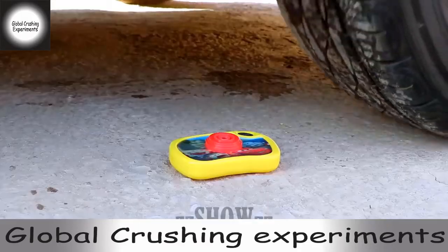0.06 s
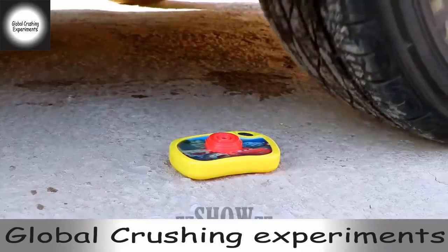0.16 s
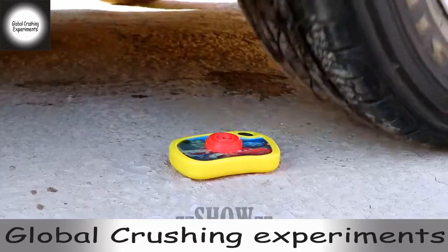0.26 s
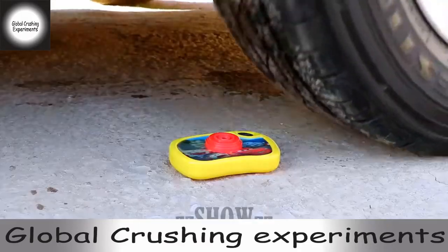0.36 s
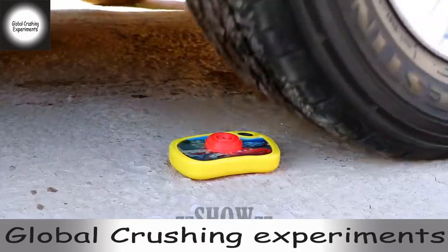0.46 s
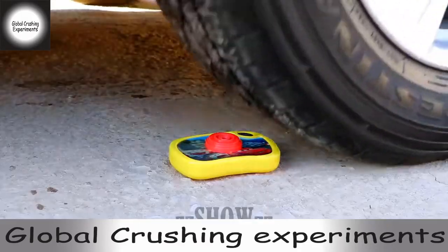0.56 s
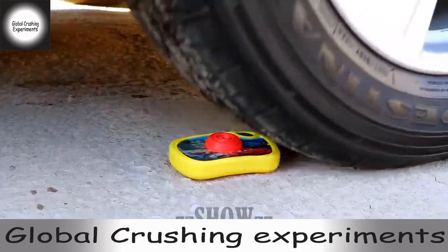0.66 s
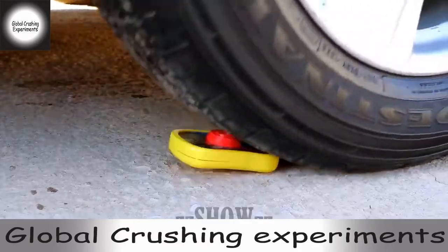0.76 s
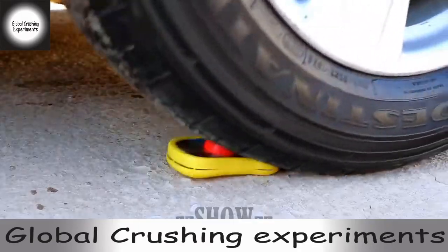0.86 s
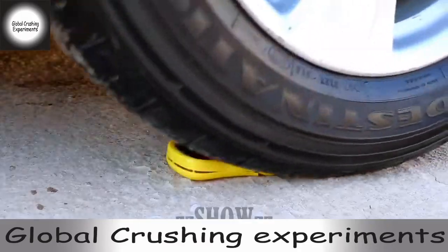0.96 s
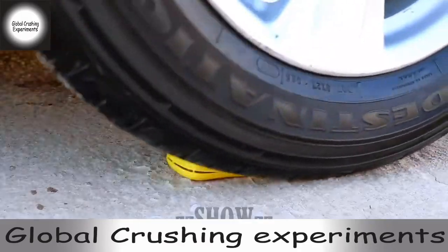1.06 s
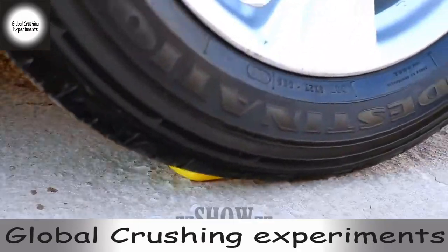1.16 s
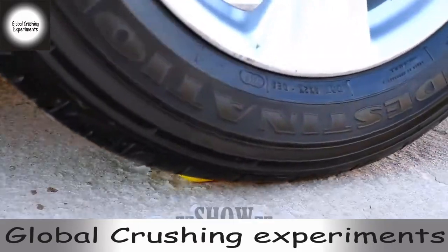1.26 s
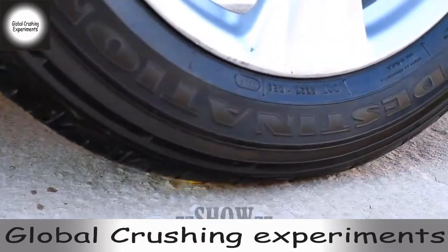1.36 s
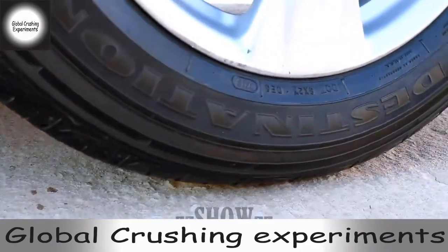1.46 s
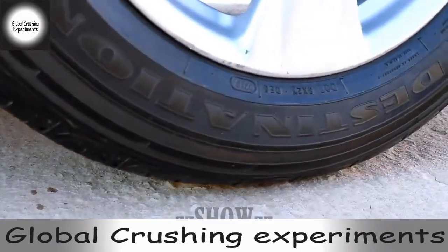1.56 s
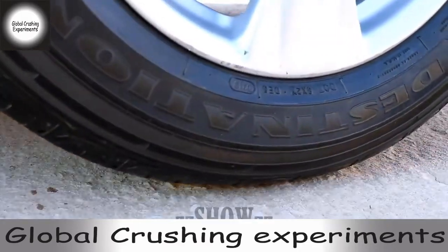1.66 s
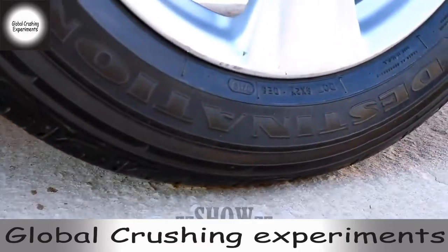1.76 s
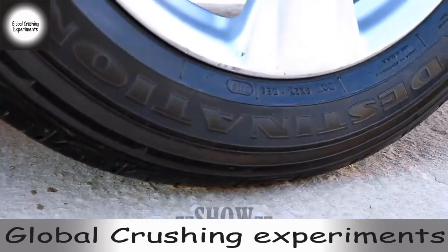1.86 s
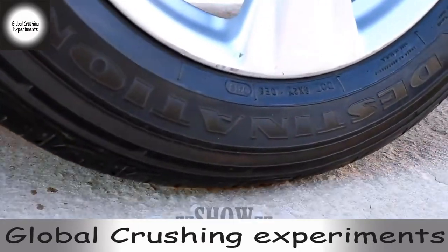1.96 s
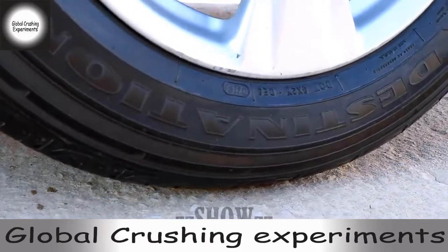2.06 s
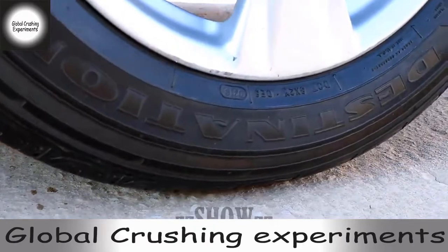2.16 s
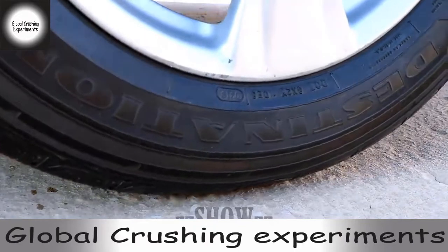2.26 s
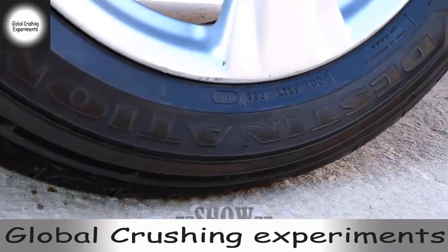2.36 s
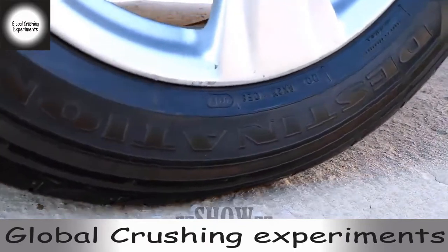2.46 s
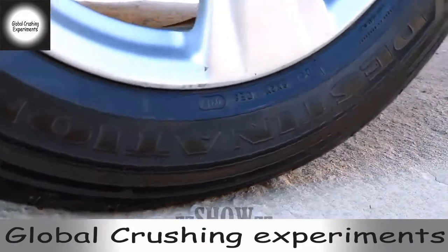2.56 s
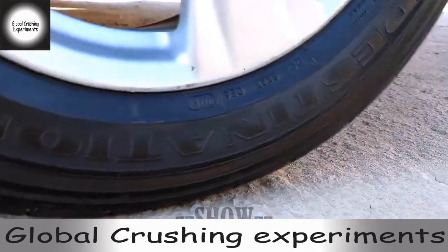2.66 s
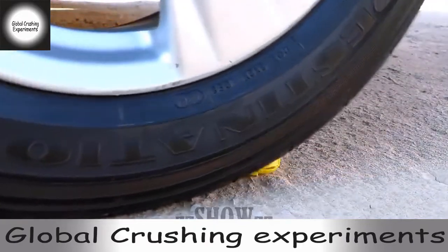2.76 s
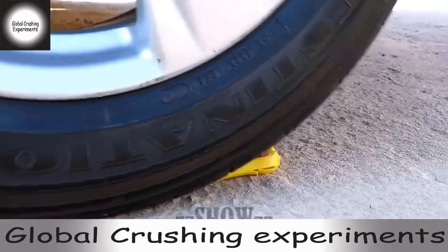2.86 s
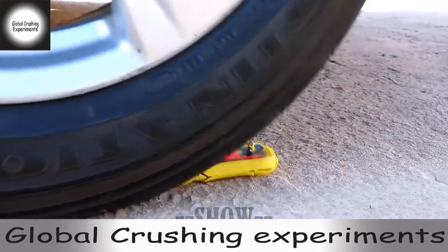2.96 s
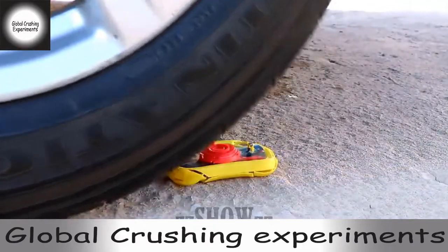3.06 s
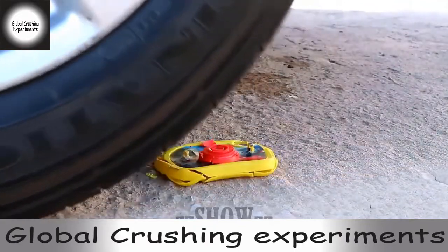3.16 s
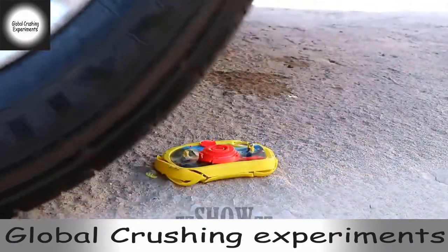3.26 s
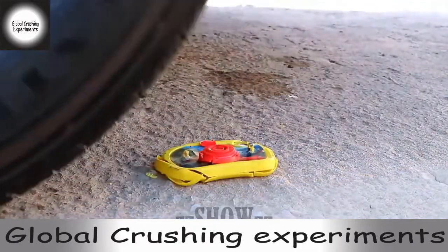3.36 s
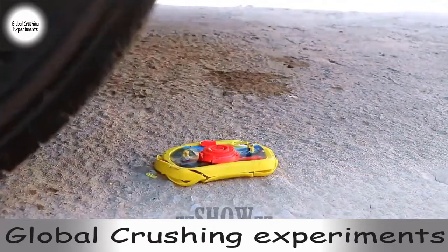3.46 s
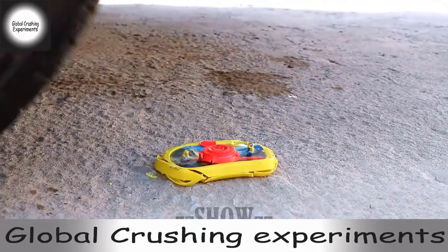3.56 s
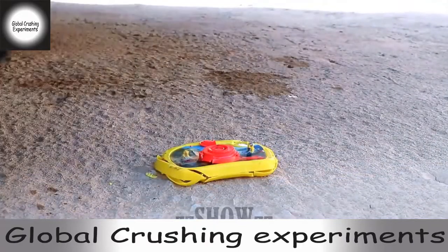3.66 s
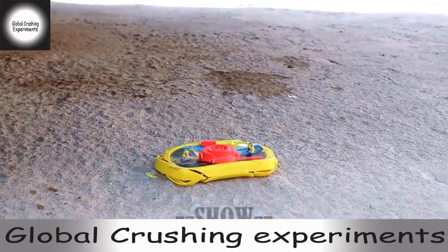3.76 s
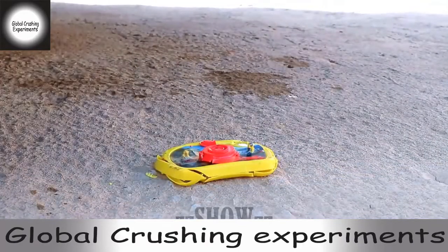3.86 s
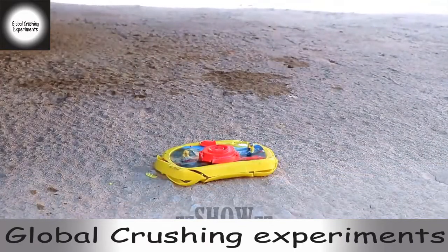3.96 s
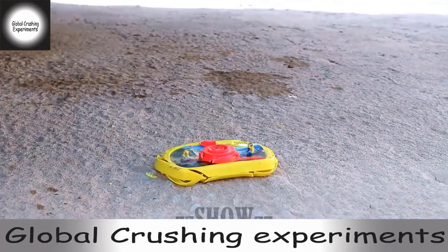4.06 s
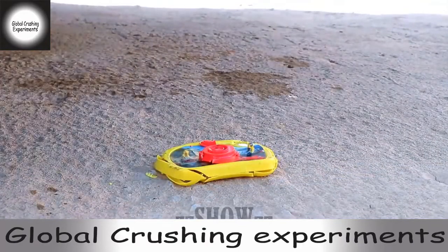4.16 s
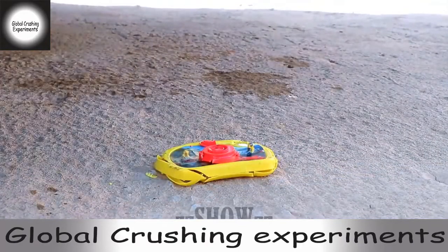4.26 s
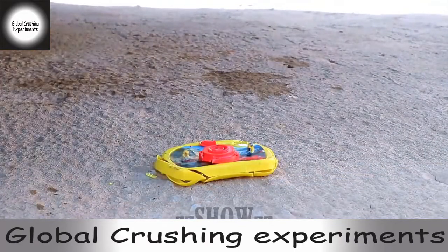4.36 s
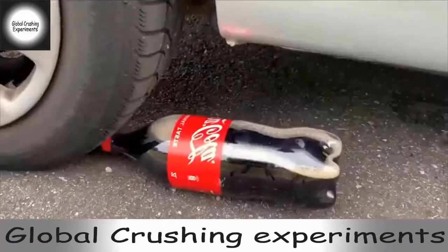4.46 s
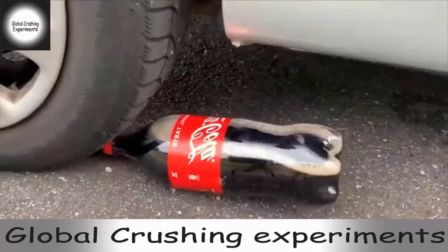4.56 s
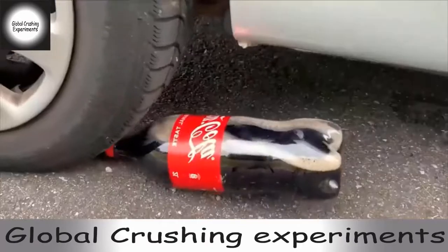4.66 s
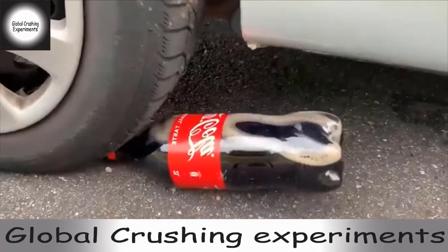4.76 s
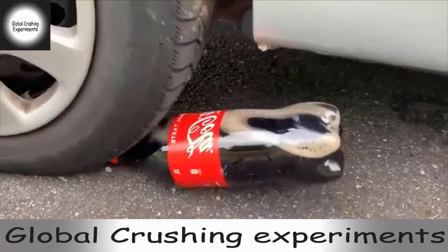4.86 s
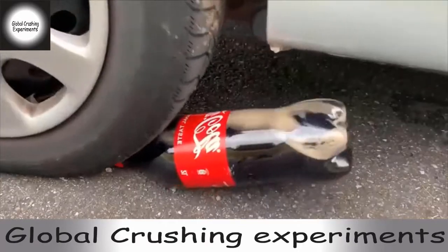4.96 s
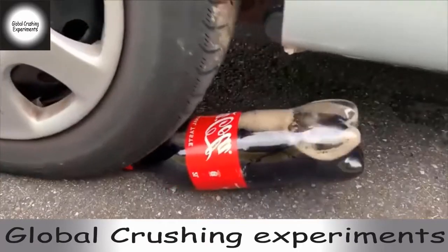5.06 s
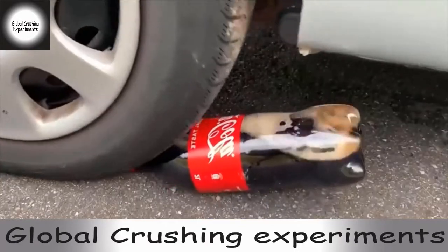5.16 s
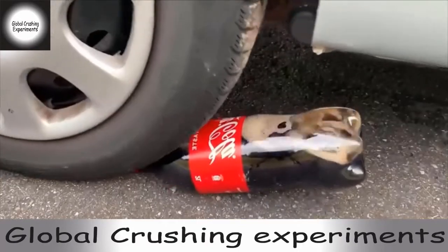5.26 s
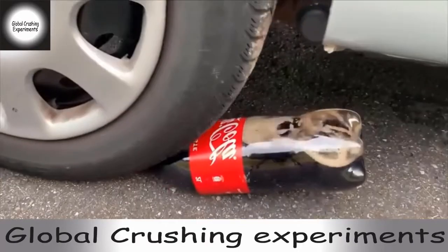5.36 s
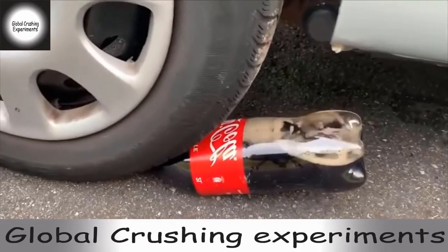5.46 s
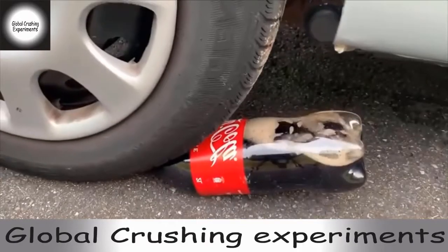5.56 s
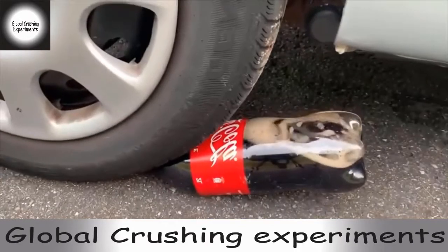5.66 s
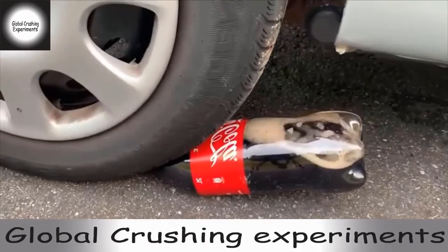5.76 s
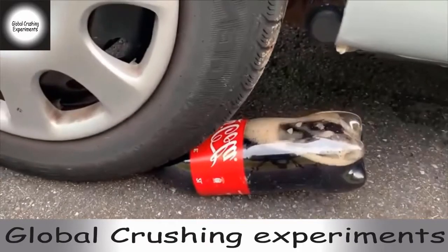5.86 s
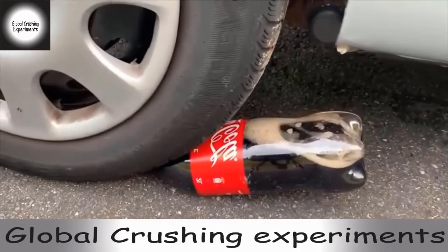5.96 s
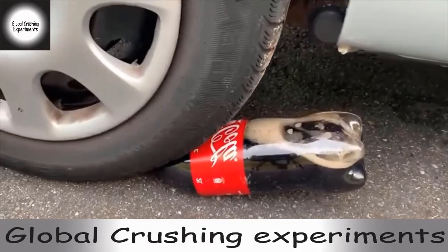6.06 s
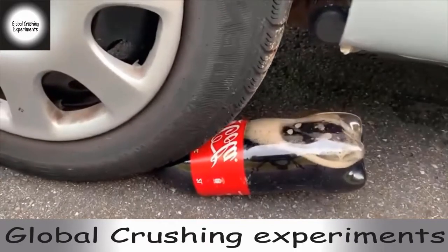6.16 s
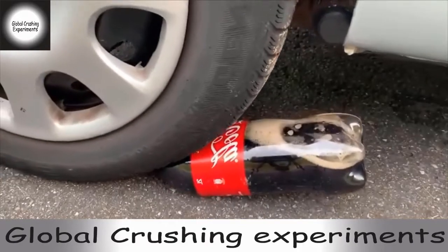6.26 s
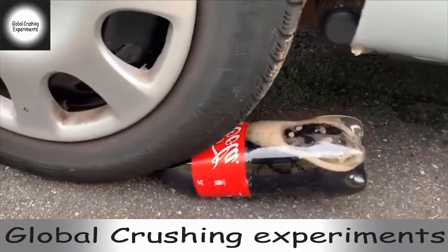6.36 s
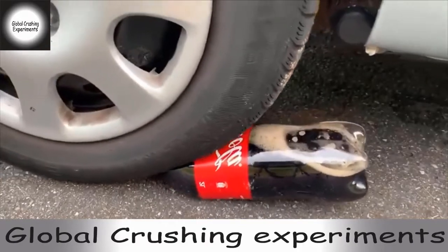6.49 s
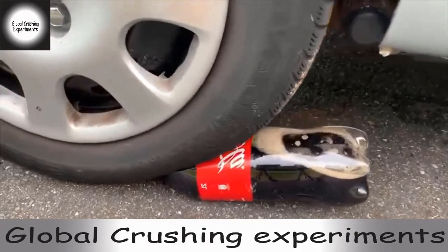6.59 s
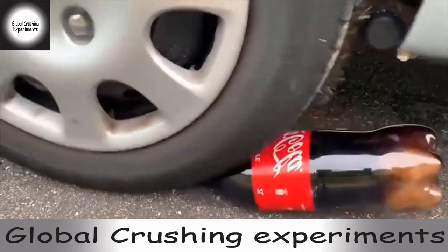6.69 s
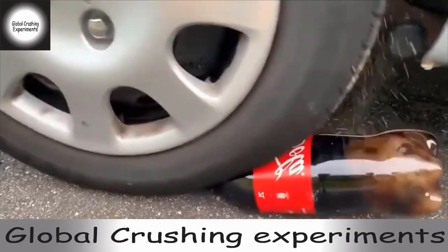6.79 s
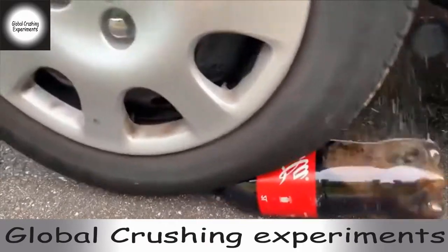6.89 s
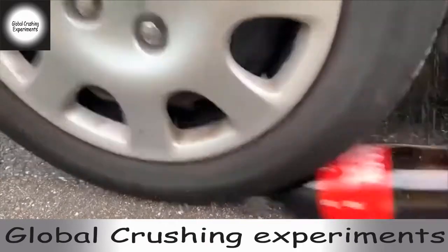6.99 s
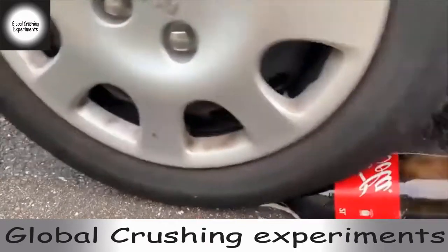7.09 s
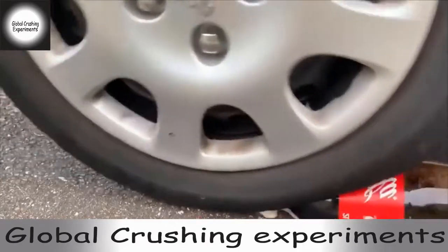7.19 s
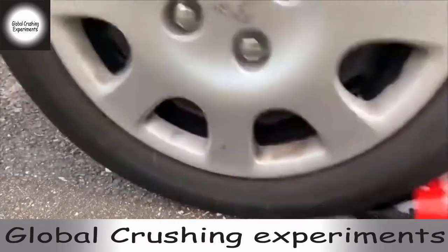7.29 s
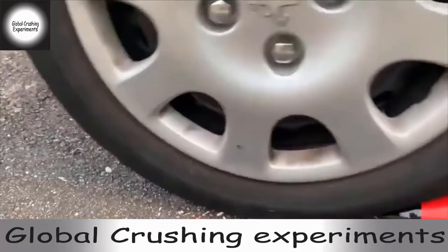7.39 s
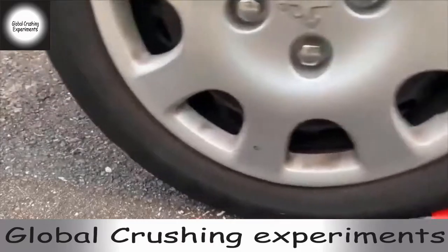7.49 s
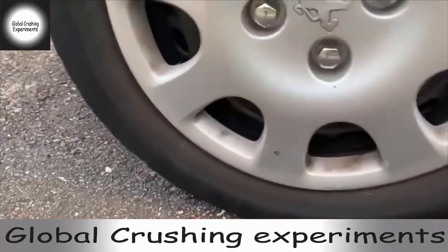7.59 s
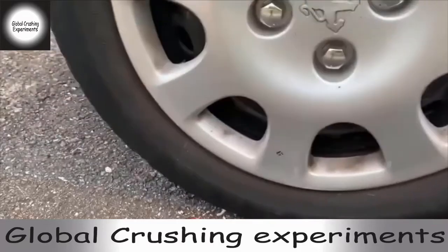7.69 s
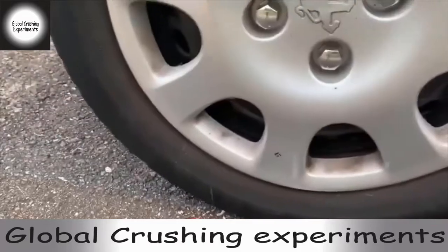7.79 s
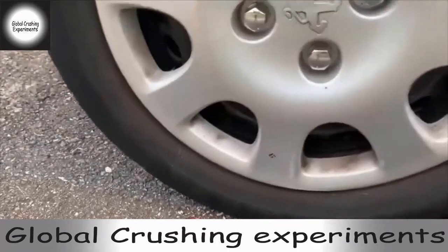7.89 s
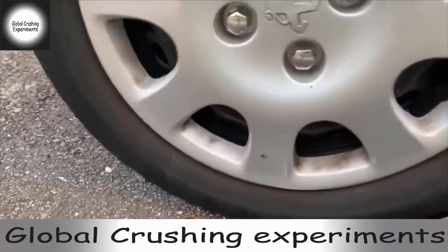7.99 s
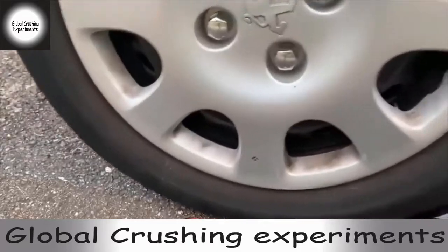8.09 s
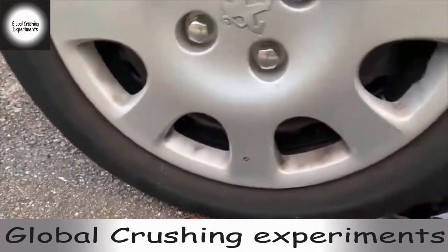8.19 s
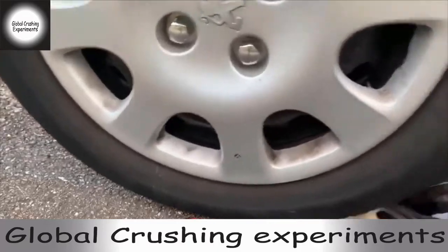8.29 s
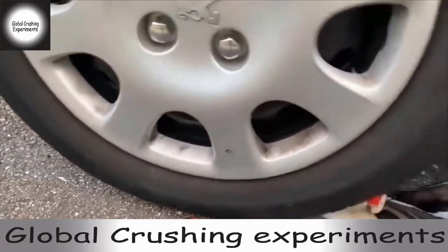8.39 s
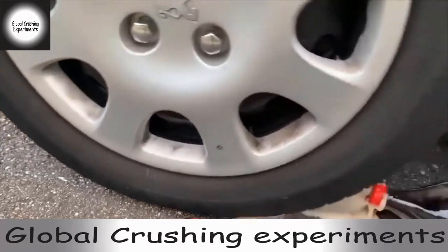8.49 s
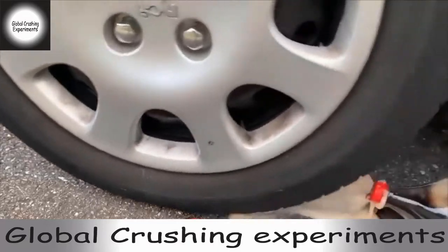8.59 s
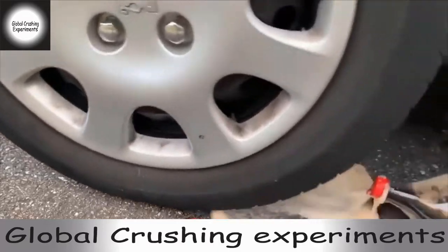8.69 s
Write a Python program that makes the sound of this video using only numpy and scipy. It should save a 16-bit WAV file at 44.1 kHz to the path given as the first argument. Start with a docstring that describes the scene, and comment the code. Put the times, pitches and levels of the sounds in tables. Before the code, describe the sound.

Outdoors, very close to the microphone, a tyre creeps over a hollow plastic toy: a dense, distorted burst of cracks and creaks, then scattered hollow snaps dying into faint ticks. A car idles quietly far off. After a hard cut, a nearer engine revs up and eases down while a full plastic bottle jerks over asphalt with scrapes, sharp pops and liquid thuds, ending in bright sputtering spray.

```python
"""A hollow plastic toy cracks under a creeping tyre, close to the microphone and loud enough to overload it:
struck resonances of shard, hollow and tyre, with creaks and air puffs. Far off in the yard a car idles.
After a cut, a second engine revs as firing orders plus exhaust noise while its tyre jerks a full
plastic bottle over asphalt: filtered noise skids, ringing ticks and at last a sputtering spray.
The first shot is mono, the second has two microphone ports."""
import sys
import numpy as np
from scipy import signal
from scipy.io import wavfile
from scipy.ndimage import uniform_filter1d

SR = 44100
rng = np.random.default_rng(int(sys.argv[2]) if len(sys.argv) > 2 else 0)


def wrap_up_sound(samples):
    """Save the sound to the file named by the first command line argument, as 16-bit audio."""
    columns = np.atleast_2d(samples).T
    # keep every value between -1 and 1, then stretch to whole-number steps
    tamed = np.clip(columns, -1, 1)
    steps = np.round(tamed * 32767).astype(np.int16)
    wavfile.write(sys.argv[1], SR, steps)


N = 384993
T = np.arange(N) / SR
CUT_S = 4.483
LEAD_S = 0.00033  # the left port hears the engine first

# spectrum of breaking plastic, for cracks and creaks: f/Hz, relative level/dB per Hz
SNAP_SPECTRUM = [(760, -28.5), (1300, -7.5), (1840, -1.5), (3140, -1), (4930, -3), (7430, -13),
                 (13200, -23), (16000, -27)]


def amp(db):
    """Decibels to gain."""
    return 10 ** (np.asarray(db) / 20)


def evened(x):
    """Scales to rms 1."""
    return x / np.sqrt(np.mean(x ** 2) + 1e-20)


def read(points, hz):
    """Reads a table on a log-frequency axis."""
    f, value = np.transpose(points)
    return np.interp(np.log(hz + 1), np.log(f + 1), value)


def level(rows, column=1):
    """Gain along a dB column, silent outside the table."""
    rows = np.array(rows)
    return amp(np.interp(T, rows[:, 0], rows[:, column], -200, -200))


def add(mix, s, sound):
    """Mixes a sound in at s seconds."""
    part = mix[..., round(s * SR):][..., :sound.shape[-1]]
    part += sound[..., :part.shape[-1]]


def colour(x, points):
    """Causal minimum-phase filter of unit energy with the given spectrum."""
    hz = abs(np.fft.fftfreq(4096, 1 / SR))
    log_gain = np.log(amp(np.maximum(read(points, hz), -100)))
    taps = np.fft.ifft(np.exp(np.conj(signal.hilbert(log_gain)))).real[:2048]
    return signal.oaconvolve(x, taps / np.linalg.norm(taps))[:len(x)]


def ring(x, hz, width_hz):
    """A band-pass mode struck by x; a unit click rings with height 1."""
    r, w = np.exp(-np.pi * width_hz / SR), 2 * np.pi * hz / SR
    return signal.lfilter([.5, 0, -.5], [1, -2 * r * np.cos(w), r * r], x)


def noise(points, patchy_db, lead_s=0., size=512, span=(CUT_S, N / SR)):
    """Patchy noise of rms 1 at two ports inside a time span; the ports share less of the treble."""
    # how alike the two ports are: f/Hz, left-right likeness (0 to 1)
    likeness = [(60, 0.96), (500, 1), (2000, 0.31), (6000, 0.093), (15000, 0.1)]
    start, stop = round(span[0] * SR), round(span[1] * SR)
    hz, out = np.fft.rfftfreq(size, 1 / SR), np.zeros((2, N))
    frames = (stop - start) * 4 // size + 5
    a, b, c, d, patches = rng.standard_normal((frames, len(hz), 5)).T
    patches = uniform_filter1d(patches, size=size // 80, axis=0)
    patches = evened(uniform_filter1d(patches, size=8192 // size, axis=1))
    same = np.clip(read(likeness, hz), 0, 1)[:, None]
    left = a + 1j * b
    delay = np.exp(-2j * np.pi * hz * lead_s)[:, None]
    right = same * left * delay + np.sqrt(1 - same ** 2) * (c + 1j * d)
    z = np.array([left, right]) * amp(read(points, hz)[:, None] + patchy_db * patches)
    sound = signal.istft(z, nperseg=size, noverlap=size * 3 // 4)[1]
    out[:, start:stop] = evened(sound[:, :stop - start])
    return out


def yard():
    """Outdoor hush as shaped noise, a steady idle drone and far exhaust puffs, every other one weaker."""
    # outdoor hush: f/Hz, relative level/dB per Hz
    hush_spectrum = [(20, -8.5), (60, -18.5), (130, -13.5), (250, -10), (380, -15), (480, -12.5),
                     (660, -12.5), (1480, -21.5), (2460, -27.5), (6500, -40), (11000, -58.5), (15500, -77)]
    # the car rolls away, hush gain before the base level: t/s, level/dB
    swell = [(0, 9.5), (.7, 9.5), (3.3, 6.5), (4.48, 6)]
    pair_hz, puffs_db = 19.6, -68  # one strong and one weak puff per pair
    hush_db, drone_hz, drone_db = -61.5, 97, -63
    turns = pair_hz * T
    beats = np.exp(-(turns % 1) / 0.091) + .5 * np.exp(-((turns + .5) % 1) / 0.065)
    beats = ring(beats, 56, 92) + 0.69 * ring(beats, 340, 150)
    hush = amp(hush_db) * noise(hush_spectrum, 1.6, size=2048, span=(0, CUT_S))[0] * level(swell)
    drone = amp(drone_db) * np.sqrt(2) * np.sin(2 * np.pi * drone_hz * T)
    return hush + drone + amp(puffs_db) * evened(beats)


def engine():
    """Firing orders as sines through the pipe, uneven cylinders as half orders, roar gated by each firing."""
    # second engine: t/s, firing f/Hz, then level/dB of firing thump, exhaust note (before the pipe),
    # exhaust roar, valve and tyre hiss
    revs = [(4.48, 22.22, -44, -20, -32, -42.5), (4.611, 22.93, -41.5, -29, -33.5, -45),
            (4.792, 26.4, -37, -28.5, -37.5, -42.5), (4.95, 31.99, -22, -26, -33, -41.5),
            (5.149, 39.07, -35, -24.5, -31.5, -36), (5.31, 40.93, -33, -23, -31.5, -38),
            (5.668, 44.06, -26, -25, -31, -38.5), (5.95, 46.62, -48, -17.5, -28.5, -38),
            (6.33, 51.5, -34, -22, -26.5, -38.5), (6.57, 47.1, -37, -19, -28.5, -33.5),
            (6.97, 40.4, -24, -21, -32.5, -35.5), (7.179, 33.98, -26, -29.5, -31, -34.5),
            (7.41, 26.85, -20.5, -32.5, -43, -30.5), (7.549, 28.34, -22.5, -29.5, -51, -35),
            (7.719, 31.3, -20, -28.5, -64, -32.5), (7.88, 33.3, -22, -28.5, -42, -33),
            (8.16, 30.4, -22.5, -28.5, -45, -37.5), (8.41, 28.85, -19.5, -34.5, -38.5, -36.5),
            (8.73, 28.9, -20, -44, -44.5, -38)]
    # how the exhaust pipe passes orders two to six: f/Hz, level/dB
    pipe = [(44, -1.5), (62, -7), (90, -3.5), (105, -10), (125, -19.5), (148, 0), (165, 3), (190, -15),
            (215, -18.5), (240, -11), (270, -20), (310, -27)]
    # upper orders through the pipe, before they waver: f/Hz, level/dB re roar
    upper = [(200, -3), (330, -22.5), (450, -13.5), (600, -18), (800, -22), (1200, -26)]
    # exhaust roar: f/Hz, relative level/dB per Hz
    roar_spectrum = [(12, -41), (20, -5.5), (87, -11), (127, -5), (163, -3.5), (339, -11.5), (494, -17.5),
                     (573, -8.5), (1010, -19), (3000, -52), (3900, -55), (6600, -120)]
    # valve and tyre hiss: f/Hz, relative level/dB per Hz
    hiss_spectrum = [(700, 5), (1200, 4), (3000, -9), (6000, -14.5), (9500, -13), (11500, -26.5),
                     (13500, -13), (15500, -18)]
    low_orders, waver_db, roar_patchy_db = 6, 3, 1.6
    cut, (s, firing_hz, *levels) = round(CUT_S * SR), np.transpose(revs)
    t = T[cut:]
    turns = np.cumsum(np.interp(t, s, firing_hz)) / SR  # one turn per firing
    coarse = t[::441]  # levels move in 10 ms steps, joined by lines
    hz, thump_db, note_db, roar_db, hiss_db = (
        np.interp(coarse, s, column) for column in (firing_hz, *levels))
    wavers = evened(uniform_filter1d(rng.standard_normal((len(coarse), 16)), size=10, axis=0))
    tone = np.zeros(len(t))
    for k in range(1, low_orders + 1):
        order_db = note_db + read(pipe, k * hz) if k > 1 else thump_db
        gain = np.sqrt(2) * np.interp(t, coarse, amp(order_db))
        half_order = amp(-26) * np.sin(2 * np.pi * (k + .5) * turns)
        tone += gain * (np.sin(2 * np.pi * k * turns + .8 * k) + half_order)
    for k, waver in enumerate(wavers.T, start=low_orders + 1):
        db = roar_db + read(upper, k * hz) + waver_db * waver
        tone += np.interp(t, coarse, amp(db)) * np.sin(2 * np.pi * k * turns + .3 * k * k)
    gate = evened(1 + 0.75 * np.exp(-(turns % 1) / 0.44))
    roar = noise(roar_spectrum, roar_patchy_db, LEAD_S, size=2048)[:, cut:]
    roar = np.interp(t, coarse, amp(roar_db)) * gate * roar
    hiss = np.interp(t, coarse, amp(hiss_db)) * noise(hiss_spectrum, 1.5, LEAD_S)[:, cut:]
    ports = np.array([tone * amp(-.7), np.interp(t - LEAD_S, t, tone)]) + roar + hiss
    return np.pad(ports, ((0, 0), (cut, 0)))


def spray():
    """Drink foam jets from the cap: bright noise that sputters as bubbles pass."""
    # drink spraying from the cap, before the sputter: t/s, level/dB
    bursts = [(8.15, -42), (8.19, -34), (8.256, -28), (8.28, -23), (8.358, -29), (8.482, -24), (8.722, -24),
              (8.73, -24.5)]
    # hiss of the jet: f/Hz, relative level/dB per Hz
    jet_spectrum = [(1760, -68), (3000, -50), (3640, -7), (7330, -4), (9390, 5), (11100, -6), (13700, 8.5),
                    (15500, -1.5)]
    sputter = amp(0.79 * evened(uniform_filter1d(rng.standard_normal(N), size=400)))
    return level(bursts) * sputter * noise(jet_spectrum, 2.5, 0.00017, span=(8, N / SR))


def ticks():
    """Short dry clicks of noise, each striking its own brief ring."""
    # grit and bottle wall pops under the tyre: t/s, level/dB (ring peaks 1.5 dB above),
    # f/Hz, decay setting/s (60 dB fall of the burst, at least 4 ms)
    pops = [(5.009, -33, 1300, 0.048), (5.414, -40, 2370, 0.021), (5.5953, -30, 5870, 0.0063),
            (5.628, -38, 6200, 0.016), (6.5914, -22.5, 1910, 0.023), (6.648, -41, 1450, 0.038),
            (6.756, -34, 3937, .025), (7.023, -17, 4616, 0.019), (7.0866, -11, 3120, 0.025),
            (7.363, -19, 8220, 0.01), (7.378, -9.5, 3077, 0.027), (7.408, -14, 1084, 0.17),
            (7.5104, -16, 8940, 0.014), (7.6017, -19, 5930, 0.0066), (7.6322, -12.5, 2860, 0.049),
            (7.638, -15, 1930, 0.11), (7.7534, -21, 1720, 0.021), (8.0367, -44, 1103, 0.019),
            (8.0805, -35, 1200, 0.03)]
    grit_db = -22  # unrung grit re the pop
    out, t = np.zeros(N), np.arange(3000) / SR
    for (s, db, hz, t60), grit in zip(pops, rng.standard_normal((len(pops), len(t)))):
        burst = grit * amp(-60 * t / max(t60, .004))
        pop = ring(burst, hz, min(.2 * hz, 8 / t60))
        add(out, s, amp(db + grit_db) * burst + amp(db + 1.5) * pop / abs(pop).max())
    return out


def skids():
    """The bottle drags over stones for a moment, its wall ringing, with a dull thud from the liquid."""
    # the bottle skids: t/s, scrape level/dB, length before the fade/s, thud level/dB,
    # brightness (4 and above brightest, -4 and below dullest)
    drags = [(6.751, -12.5, 0.046, -13, -5.5), (7.013, -23.5, 0.016, -46, 4.5),
             (7.092, -14, 0.038, -4.5, 1.5), (7.38, -21.5, 0.013, -41, -6), (7.392, -19.5, 0.038, -9, 4),
             (7.498, -30.5, 0.027, -25, 19), (7.619, -20, 0.054, -21, -0.5),
             (8.023, -30, 0.02, -15.5, -1.5), (8.452, -29, 0.0077, -54, 21)]
    # plastic on asphalt: f/Hz, relative level/dB per Hz
    scrape_spectrum = [(120, -47), (200, -12), (715, 4), (2700, -7.5), (4330, -10), (7220, -18),
                       (8660, -13), (10600, -19), (11200, -44), (13400, -13), (15500, -42)]
    # bottle wall modes: f/Hz, base width/Hz (30 is added), level/dB before width and frequency weighting
    wall_modes = [(323, 12, 14), (740, 42, -19), (1150, 16, 9.5), (1880, 37, -33), (3400, 97, 26)]
    # liquid thud: f/Hz, relative level/dB per Hz
    thud_spectrum = [(20, -17), (45, -1.5), (110, -10.5), (200, -13.5), (400, -18.5), (900, -54.5)]
    stone_spread_db, span = 2, (6.7, N / SR)
    out, t = np.zeros((2, N)), np.arange(SR // 3) / SR
    catches = np.repeat(rng.exponential(1, N // 40 + 1), 40)[:N]
    stones = amp(stone_spread_db * catches)  # single stones catch the wall
    bed = noise(scrape_spectrum, 1.5, .00015, span=span)
    bed = bed * evened(stones + 5.4)
    wall = sum(amp(db) * np.sqrt(w) * ring(bed, hz, w + 30) / hz for hz, w, db in wall_modes)
    bed = bed + amp(-9) * evened(wall) * np.std(bed)
    bright = np.diff(bed, prepend=0, axis=1)
    thuds = noise(thud_spectrum, 6.2, size=2048, span=span)
    for s, db, length, thud_db, tilt in drags:
        fade_db = -60 * np.maximum(t - length, 0)
        shape = np.minimum(t / 0.0085, 1) * amp(fade_db / 0.15)
        at = slice(round(s * SR), round(s * SR) + len(t))
        n = bed[:, at].shape[1]
        grain = bed[:, at] + np.clip(tilt / 4, -1, 1) * bright[:, at]
        slosh = np.minimum(t / 0.065, 1) * amp(thud_db + fade_db / .5)
        add(out, s, amp(db) * shape[:n] * grain + slosh[:n] * thuds[:, at])
    return out


def puffs():
    """Single pushes of air; the capsule lets the pressure leak away and swings back."""
    # air squeezed out of the toy pushes the microphone: t/s, signed height before the leak, length/s
    pushes = [(.8915, .9, .006), (1.0045, .25, .003), (1.0725, -1.6, .006), (1.2655, .8, .006),
              (2.2000, -.4, .008), (2.5285, -.3, .002)]
    out = np.zeros(N)
    for s, height, length in pushes:
        add(out, s, height * np.hanning(round(length * SR)))
    return signal.lfilter(*signal.butter(2, 24, "high", fs=SR), out)


def creaks():
    """Tiny random snaps of many sizes under the load, ringing the shell."""
    # small creaks of the loaded shell between cracks: t/s, level/dB
    loads = [(0.7, -92), (0.84, -26), (0.99, -17), (1.26, -30.5), (1.56, -40.5), (1.61, -50.5),
             (2.12, -54.5), (2.23, -42.5), (2.84, -43), (3.0, -36), (3.05, -41), (3.2, -45), (3.23, -59),
             (3.35, -69)]
    # toy shell modes: f/Hz, base width/Hz (200 is added), level/dB before width weighting
    shell_modes = [(950, 29, 30.5), (2300, 48, -8), (3020, 32, -28), (3400, 65, -12), (3920, 24, -17),
                   (3790, 23, -12.5), (5300, 170, -19.5), (5830, 46, -19.5), (5804, 28, -24)]
    strikes = rng.random(N) < 300 / SR  # about 300 snaps a second
    size = amp(1.8 * np.minimum(rng.exponential(1, N), 4)) * strikes
    decay = np.exp(-1 / (.005 * SR))
    burst = signal.lfilter([1], [1, -decay], size) * rng.standard_normal(N)
    shell = sum(amp(db) * np.sqrt(w) * ring(burst, hz, w + 200) for hz, w, db in shell_modes)
    return level(loads) * evened(evened(colour(burst, SNAP_SPECTRUM)) + amp(-10) * evened(shell))


def cracks():
    """Each break is a sharp tick and a dying crunch that ring a shard, the hollow inside and the tyre."""
    # toy cracks: t/s, strength/dB, shard ring f/Hz, hollow f/Hz, then level/dB re strength of
    # hollow (before the common hollow_db), crunch (before colouring) and shard
    breaks = [(0.7915, -12.5, 3450, 1070, -15, -16, -16), (0.813, 4, 4510, 710, -23, -13.5, -10.5),
              (0.8283, 13, 4710, 560, -23, -10, -14.5), (0.8433, 5.5, 3596, 587, -20, -6.5, -9.5),
              (0.8547, 5.5, 1940, 1005, -23.5, -13, -9.5), (0.8626, 3.5, 2560, 1030, -31.5, -19.5, -9.5),
              (0.8789, 2.5, 1865, 1040, -19, -10, -11), (0.8919, 12.5, 2330, 540, -11, -9, -10),
              (0.9026, 4.5, 2700, 770, -10.5, -12.5, -8.5), (0.9128, 7.5, 2565, 1095, -17, -4, -8.5),
              (0.9247, 8, 1860, 729, -12, -10.5, -6), (0.9373, 4, 1880, 1060, -16, -8.5, -10),
              (0.9592, -1, 2350, 1070, -25, -8, -9.5), (0.9701, 10.5, 2370, 1080, -17, -6, -13.5),
              (0.984, 4.5, 2077, 864, -14.5, -10.5, -9), (0.9906, 10.5, 3880, 1100, -18, -4, -8.5),
              (0.9992, 11.5, 3570, 649, -17, -8, -10.5), (1.014, 5.5, 1731, 973, -6.5, -7.5, -9.5),
              (1.0244, -5.5, 3330, 890, -9.5, -13, -9.5), (1.042, -4, 3280, 939, -6, -14.5, -8.5),
              (1.0551, 1, 1901, 977, -15, -13, -11), (1.0724, 9, 2560, 564, -9, -9, -6.5),
              (1.0986, 10.5, 2137, 1080, -14.5, -5.5, -14), (1.115, 3.5, 2140, 1060, -15, -10.5, -9.5),
              (1.123, -4.5, 2090, 740, -5.5, -13.5, -10.5), (1.1672, 5, 3560, 1040, -12.5, -9.5, -6),
              (1.1973, 0.5, 2420, 1040, -25, -8.5, -11.5), (1.2136, -14.5, 2430, 1060, -18, -8.5, -8),
              (1.2423, 6, 2180, 1020, -26.5, -9.5, -4.5), (1.25, 2, 2100, 940, -17, -7.5, -12.5),
              (1.2676, 8.5, 2406, 922, -8.5, -4, -6), (1.295, -4.5, 2413, 780, -13, -10, -3),
              (1.3316, 3, 2380, 680, -19.5, -15.5, -17.5), (1.3487, 2.5, 5660, 720, -20, -19, -8),
              (1.3688, -5.5, 2395, 680, -28, -10, -10.5), (1.3798, 4.5, 5350, 727, -15.5, -11.5, -10.5),
              (1.4016, -12, 5520, 759, -13, -13, -8), (1.4202, 7.5, 2323, 900, 0, -8.5, -8.5),
              (1.435, 0, 2760, 730, -2.5, -8, -9), (1.4483, -15, 2165, 990, -11, -4, -4.5),
              (1.4906, 2, 3820, 880, -11.5, -8, -15), (1.5376, -26, 2837, 705, 6, -14, -7),
              (1.5554, -23.5, 3170, 760, 5, -8, 7.5), (1.6852, -16, 5680, 870, -23.5, -36, -15),
              (1.7757, 2.5, 3930, 878, -4, -6, -1.5), (1.8052, -10, 2290, 978, 0, -11, -8),
              (1.8149, 0.5, 5270, 940, -5, -9, -7.5), (1.8651, -3, 5720, 860, -14, -7, -7),
              (1.9789, -13.5, 3910, 970, -18, -20, -13), (2.0081, -11.5, 2110, 900, -15.5, -13.5, -7),
              (2.0915, 3.5, 3860, 880, -23.5, -26.5, -6), (2.1326, -20.5, 3720, 925, -8, -21, -9.5),
              (2.1872, 2, 3440, 870, -5, -10.5, -8), (2.1995, 10.5, 3776, 953, -2.5, -10, -13),
              (2.2196, -5.5, 2550, 961, 2, -17.5, -6.5), (2.249, -19, 2480, 611, -2, -12, -9),
              (2.2628, -24, 2507, 920, -9, -5, -4), (2.3387, -11, 2700, 942, 2, -8, -1.5),
              (2.3639, -6.5, 3747, 917, -3, -4.5, -15), (2.418, -9, 5300, 870, -7.5, -23, -14.5),
              (2.4494, -24, 2540, 972, -3, -12, -10.5), (2.4831, -6.5, 2613, 895, -2.5, -25, -14),
              (2.501, -0.5, 5210, 954, -14.5, -15, -9), (2.5299, 5, 2710, 925, -2, -13, -14),
              (2.5592, -19.5, 2320, 1030, 5, -8.5, -6.5), (2.5683, -14.5, 5230, 740, -17.5, -7, -8),
              (2.644, -22.5, 3240, 900, -1, -12, -6), (2.6717, -26, 2240, 910, -5, -3, -6),
              (2.7073, -0.5, 3330, 880, -12.5, -13.5, -15.5), (2.7141, -1, 2460, 919, 1, -22.5, -13),
              (2.7437, -25, 1700, 830, 6.5, -5, -7.5), (2.7581, -23.5, 1720, 730, 1, -17.5, -10),
              (2.7842, -4.5, 4210, 773, -36, -19.5, -11), (2.7996, -32, 3150, 730, 3, -23, -9),
              (2.8379, -31, 3400, 750, -5, -8, -2), (2.8643, -19, 3070, 950, -8, 4, -9),
              (2.881, -18, 5000, 900, -16, -2, -9), (2.9071, -15, 2420, 797, -17, -10, -3),
              (2.9224, -17, 2020, 826, -14, -8, -1), (2.9383, -11.5, 3500, 1060, -8, -1, 3.5),
              (2.9686, -16, 2950, 640, -22, -2.5, -9), (2.9871, -15, 3475, 930, -6, 1.5, 0),
              (2.9956, -28, 2550, 670, -24, -10, -1), (3.068, -19.5, 1960, 990, -24, -7.5, -7),
              (3.108, -35.5, 2170, 689, -38, 0, -7), (3.1407, -29.5, 1980, 738, -41, 0, -2),
              (3.162, -30.5, 2160, 750, -37, -4.5, 1), (3.1813, -36, 3650, 939, -30, -6, -6),
              (3.2515, -43.5, 4800, 746, -27, -5, 4), (4.0957, -19, 3980, 940, -39, -16, -11)]
    tick_db, hollow_db = -1.5, 6.5  # common to every crack
    crunch_t60_s = 0.035
    tyre_hz, tyre_width_hz = 203, 30  # air ring inside the tyre
    snaps, out, t = np.zeros(N), np.zeros(N), np.arange(SR // 8) / SR
    draws = rng.standard_normal((len(breaks), 3, len(t)))
    for (s, db, shard_hz, hollow_hz, inside_db, crunch_db, shard_db), (a, b, c) in zip(breaks, draws):
        tick = ring(a * amp(-60 * t / 0.0042), 4200, 7000)
        # the car floor adds a short tail
        crunch = b * (amp(-60 * t / crunch_t60_s) + amp(-24 - 60 * t / 0.33))
        add(snaps, s, amp(db + crunch_db) * crunch)
        shard = ring(b * amp(-60 * t / .02), shard_hz, 0.03 * shard_hz)
        # the shell keeps shifting after the break
        knock = c * (amp(-60 * t / 0.013) + amp(-20.5 - 60 * t / 0.2))
        hollow = ring(knock, hollow_hz, 60) + 0.54 * ring(knock, .78 * hollow_hz, 83)
        hollow += 0.94 * ring(knock, 650, 210) + 0.16 * ring(knock, 310, 250)
        hollow += 0.12 * ring(knock, 170, 150)
        add(out, s, amp(db + tick_db) * tick / abs(tick).max())
        add(out, s, amp(db + shard_db) * shard / abs(shard).max())
        add(out, s, amp(db + inside_db + hollow_db) * hollow / abs(hollow).max())
    tyre = ring(snaps, tyre_hz, tyre_width_hz) * amp(-47.5) + ring(snaps, 780, 478) * amp(-20.5)
    return out + colour(snaps, SNAP_SPECTRUM) + tyre


def scene():
    """Two shots joined by a cut; the second has a lower treble limit."""
    first = yard() + puffs() + creaks() + cracks()
    second = engine() + spray() + ticks() + skids()
    duller = signal.firwin(255, 15200, window=("kaiser", 7), fs=SR)[None]  # cutoff in Hz
    return first * (T < CUT_S) + signal.oaconvolve(second, duller, "same") * (T >= CUT_S)


def record(dry):
    """The microphone overloads by hard clipping, then a low-pass limits the band."""
    clipped = np.clip(dry, -.95, .95)
    band_limit = signal.firwin(511, 16100, window=("kaiser", 9), fs=SR)[None]  # cutoff in Hz
    return signal.oaconvolve(clipped, band_limit, "same")


dry = scene()
out = record(dry)
wrap_up_sound(out)
```